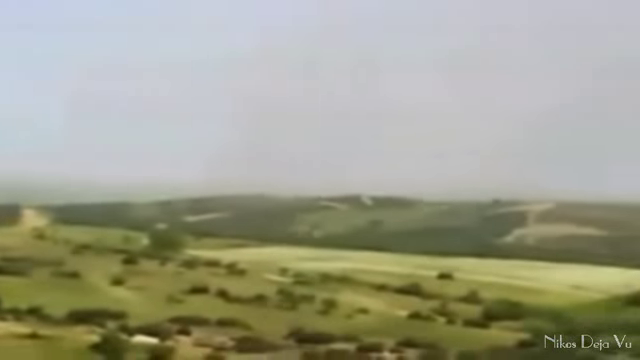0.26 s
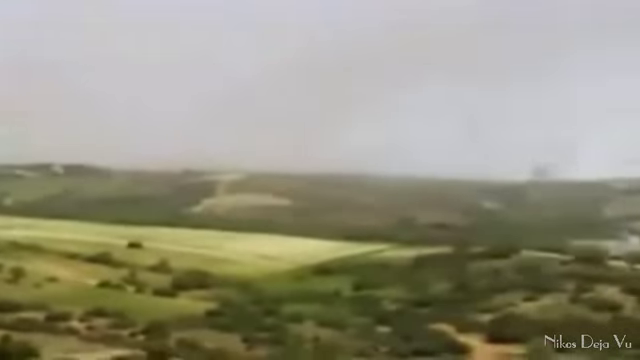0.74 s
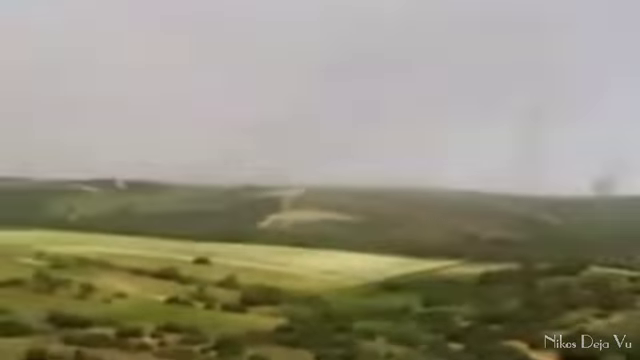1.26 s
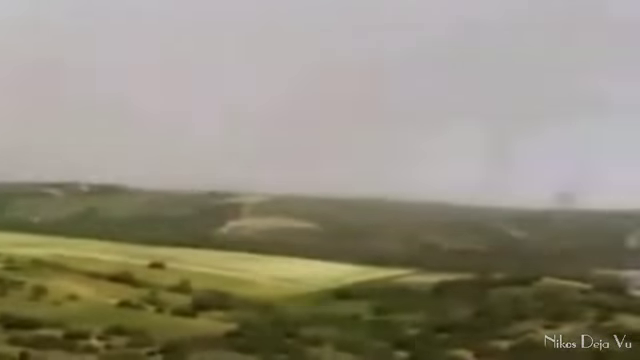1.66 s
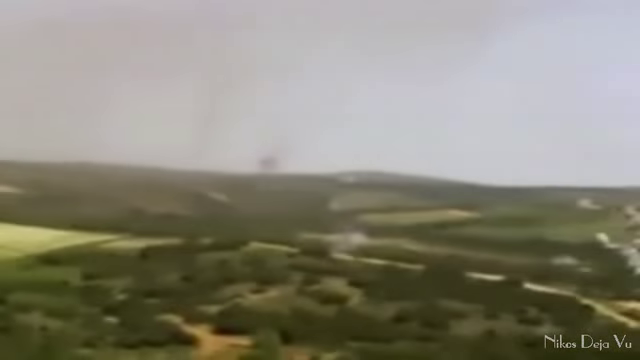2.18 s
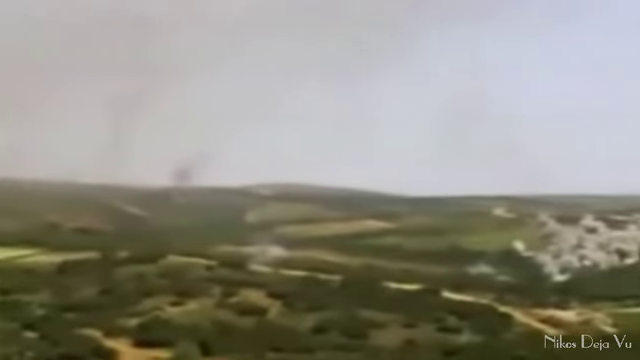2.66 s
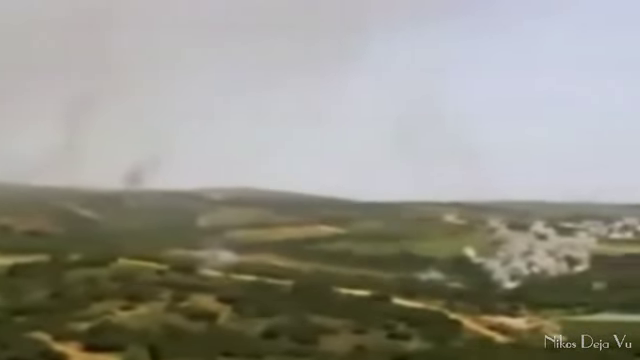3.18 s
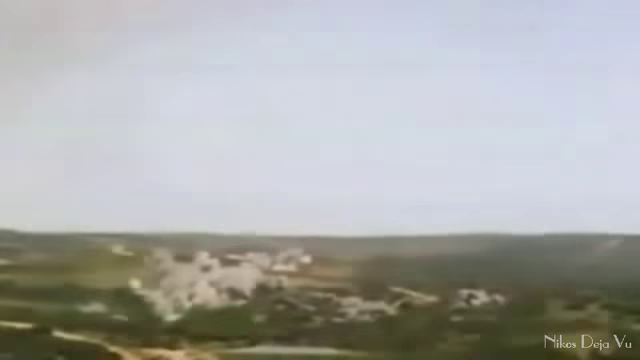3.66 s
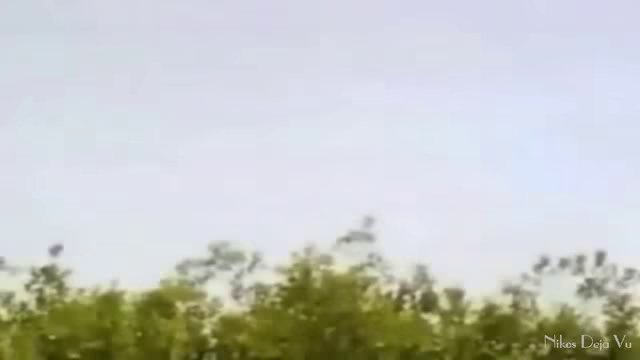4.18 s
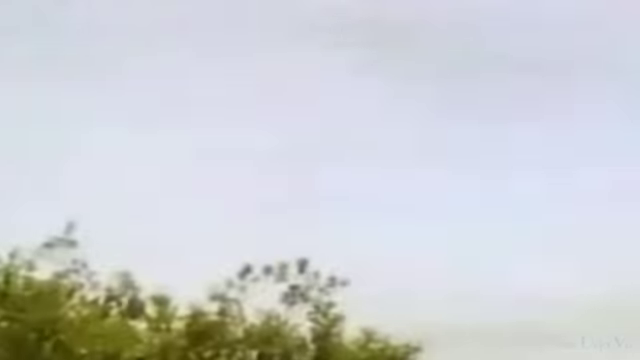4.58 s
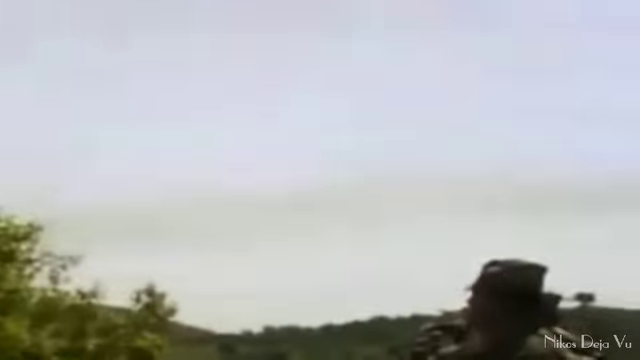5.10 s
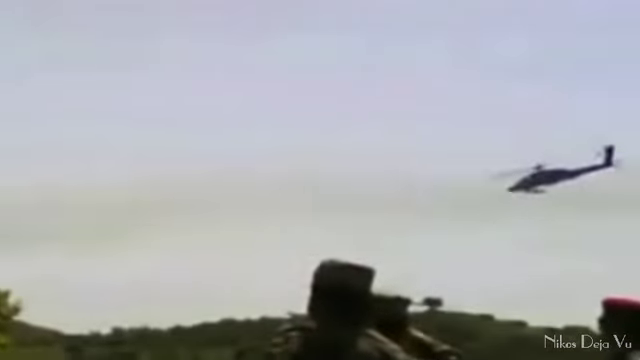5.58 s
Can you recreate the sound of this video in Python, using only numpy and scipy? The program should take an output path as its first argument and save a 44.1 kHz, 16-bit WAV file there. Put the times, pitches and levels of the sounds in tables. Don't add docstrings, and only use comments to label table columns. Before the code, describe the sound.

A hovering helicopter fires two roaring rocket salvos with dull gun thuds, then far impacts crack and boom in a string over chopping rotor noise.

```python
import sys
import numpy as np
from scipy import signal
from scipy.fft import rfft, irfft
from scipy.io import wavfile
from scipy.ndimage import uniform_filter1d

SR = 44100
rng = np.random.default_rng(int(sys.argv[2]) if len(sys.argv) > 2 else 0)


def transcribe(signal):
    frames = np.atleast_2d(signal).T
    limited = np.clip(frames, -1, 1)
    pcm = np.round(limited * 32767).astype(np.int16)
    wavfile.write(sys.argv[1], SR, pcm)


def ratio_of_db(decibels):
    return 10 ** (np.asarray(decibels, float) / 20)


N = 257544
T = np.arange(N) / SR
F = np.fft.rfftfreq(N, 1 / SR) + 1e-3

# low edge [f/Hz], high edge [f/Hz]
ROAR_BANDS_HZ = [(450, 1200), (40, 350), (1300, 3000), (3300, 7500)]
# [f/Hz], density [level/dB per Hz]
ROAR_COLOUR = [(15, -44), (25, -31.5), (49, -0.5), (98, -2), (134, 1.5), (202, 1), (416, -2), (504, 4.5),
               (656, 8), (963, 2), (1600, -3), (2180, -6), (3050, -8), (5700, -16.5), (7790, -31),
               (10100, -80.5), (17100, -120)]
# [t/s], [level/dB]
ROTOR_LEVEL = [
    (3.9, -27),
    (4.287, -29),
    (4.564, -33.5),
    (4.898, -31),
    (5.332, -29.5),
    (5.552, -29),
    (5.84, -31.5),
]
# [f/Hz], density [level/dB per Hz]
ROTOR_COLOUR = [(15, -22.5), (25, 1), (152, 0.5), (480, -3.5), (672, 0), (1040, -6), (2400, -9.5),
                (3280, -19.5), (3610, -20.5), (3880, -22), (7790, -39.5), (10100, -58.5), (17100, -120)]
# [t/s], strength [level/dB], brightness [f/Hz], ground echo delay [t/ms], echo [level/dB]
BLASTS = [(4.2194, 5, 2700, 14, 0.5), (4.449, 4, 2500, 13, 2), (4.549, 3, 4970, 13, -6),
          (4.742, 3, 513, 18, 1), (4.895, 4.5, 2190, 14, 0.5), (5.068, 2.5, 392, 17, -5.5),
          (5.3665, 5, 2180, 16, -1), (5.4838, 6.5, 2290, 13, 5), (5.5735, -4.5, 350, 19, -20),
          (5.5836, 3, 2360, 15, 4), (5.745, 6.5, 1820, 11, -8), (5.773, 3, 1900, 15, 1.5)]
# [t/s], strength [level/dB], brightness [f/Hz], ground echo delay [t/ms], echo [level/dB]
IGNITIONS = [
    (1.634, 4.9, 1700, 14, -6.5),
    (1.7005, 1.9, 2120, 16, -17.5),
]
# [t/s], peak [level/dB], pitch [f/Hz]
THUDS = [(0.453, -14.5, 212), (.490, -10, 199), (0.7955, -7, 179), (0.898, -5.5, 168), (1.012, -16, 171),
         (1.146, -16.5, 167), (3.246, -13, 115.4), (3.35, -6, 118), (3.549, -2, 149), (3.608, -9.5, 63),
         (3.703, -10.5, 131), (3.84, -18, 151)]
# [t/s], [level/dB], distance [0-1]
SALVOS = [
    [(0, -14.5, 0.22), (.27, -13, 0.02), (.56, -16, 0.6), (.75, -17.5, 0.75), (.9, -22, 1),
     (1.02, -21, 0.88), (1.31, -30, .6), (1.55, -27.5, 1), (1.631, -28, 1)],
    [(1.636, -18, 0.63), (1.85, -16, .5), (1.97, -12.5, 0.64), (2.42, -11.5, 0.5), (2.75, -11.5, 0.47),
     (3.39, -14, 0.66), (3.72, -19.5, 0.89), (3.9, -26.5, 0.74), (4.17, -35, 0.7)],
]
# first [f/Hz], last [f/Hz], then first, midway and last [level/dB]
FRINGES = [
    [(843, 820, -8, -8.5, -9.5), (590, 560, -2.5, -3.5, 9.5), (300, 160, 6.5, 0, -4.5),
     (3280, 3250, -2.5, 2, 10), (4640, 5300, 2.5, -8, -6.5), (1390, 1350, 5.5, 4, 1.5),
     (2550, 2700, 0.5, 1.5, 7)],
    [(2505, 4400, -10.5, -0.5, 2.5), (2126, 2600, 3.5, 4, 6), (798, 800, -5, -2, -14),
     (957, 810, 4, 0.5, -1.5), (1546, 1850, 0.5, -6.5, 0.5), (4230, 6300, 3.5, 6, -7),
     (603, 580, -2, -2, 5.5), (2380, 3100, -0.5, 2.5, 5), (1320, 1500, 5, -3, 6)],
]

# close by, and their change at full distance (dB)
NEAR_DB, FAR_DB = [-13, 0, -5], [16.5, 1.44, -8.5]
FRINGE_WIDTH_HZ, FRINGE_WIDTH_SHARE = 48, .05
BLADE_HZ = 19
CRACK_DB, CRACK_DB_PER_OCTAVE = -6.5, 6.5
HILLS_T60_S, HILLS_DB = 0.36, -21
OVERLOAD = 0.65
TICK_S, TICK_DB = 2.4618, -25
TOP_HZ = 7990


def level(x, db):
    return x * ratio_of_db(db) / np.sqrt(np.mean(x ** 2))


def walk(rate):
    k = int(SR / rate)
    held = np.repeat(rng.standard_normal(N // k + 1), k)
    return 1.3 * uniform_filter1d(uniform_filter1d(held, k), k)[:N]


def low(x, hz):
    return signal.lfilter(*signal.butter(2, min(hz, .4 * SR), fs=SR), x)


def band(x, hz, spread):
    edges = [hz / spread, min(hz * spread, .4 * SR)]
    return signal.lfilter(*signal.butter(2, edges, "band", fs=SR), x)


def noise_bands(colour):
    hz, db = np.transpose(colour)
    spectrum = rfft(rng.standard_normal(N)) * ratio_of_db(np.interp(np.log(F), np.log(hz), db))
    centres = 22 * 2 ** np.arange(0, 9, .5)
    shapes = (np.clip(1 - 2 * np.abs(np.log2(F / c)), 0, 1) for c in centres)
    return spectrum, centres, [irfft(spectrum * s, N) for s in shapes]


def rotor():
    s, db = np.transpose(ROTOR_LEVEL)
    phase = 2 * np.pi * BLADE_HZ * T + 0.5 * walk(9.2)
    chop_db = 1.6 * np.cos(phase) + .6 * walk(25)
    wash = 0
    for noise in noise_bands(ROTOR_COLOUR)[2]:
        wash = wash + noise * ratio_of_db(chop_db + 1.6 * walk(9.1))
    return level(wash, 0) * ratio_of_db(np.interp(T, s, db))


def hills(x):
    t = T[:SR]
    scatter = rng.standard_normal(len(t)) * (rng.random(len(t)) < .05) * (t > .022)
    tail = band(scatter, 500, 4.2) * np.exp(-np.log(1000) * t / HILLS_T60_S)
    return ratio_of_db(HILLS_DB) * signal.fftconvolve(x, tail / np.sqrt(np.sum(tail ** 2)))[:N]


def thuds():
    out, t = np.zeros(N + SR), T[:SR // 10]
    for s, db, hz in THUDS:
        cycle = np.sin(2 * np.pi * hz * t) * np.exp(-(t * hz) ** 2)
        start = int(s * SR)
        out[start:start + len(t)] += ratio_of_db(db) * cycle
    return out[:N]


def blasts(table, push_share):
    out, t = np.zeros(N + SR), T[:SR // 4]
    for s, db, bright_hz, echo_ms, echo_db in table:
        crack_db = CRACK_DB + CRACK_DB_PER_OCTAVE * np.log2(bright_hz / 2000)
        push_s = push_share * echo_ms / 1000
        push = -2.1 * (t < push_s)
        rebound = np.exp(-(np.abs(t - 3.2 * push_s) / (2.1 * push_s)) ** 2)
        suction = 0.81 * (t >= push_s) * rebound
        hiss = rng.standard_normal((4, len(t)))
        roll = 3.2 * band(hiss[3], 75, 2.6) * np.exp(-t / .04) * (t > echo_ms / 1000)
        spray = band(hiss[0], bright_hz, 1.9) + 2.0 * band(hiss[0], 1900, 1.4)
        crack = spray * np.exp(-((t - .8 * push_s) / .0014) ** 2)
        crack = 3.27 * ratio_of_db(crack_db) * crack / np.max(np.abs(crack))
        debris = band(hiss[1:], 500 + 0.1 * bright_hz, 2.62) * np.exp(-t / 0.01) * (t > push_s)
        debris = 1.16 * ratio_of_db(0.14 * crack_db) * debris
        wave = low(push + suction, bright_hz) + crack + debris[0] + roll
        smear = 0.21 * push - np.exp(-t / 0.011)
        echo = low(smear, 150 + 0.27 * bright_hz) + 0.79 * debris[1]
        lag = int(echo_ms * SR / 1000)
        wave[lag:] += ratio_of_db(echo_db) * echo[:-lag]
        start = int(s * SR)
        out[start:start + len(t)] += ratio_of_db(db - 12.5) * wave
    return out[:N]


def fringes(x):
    f, t, z = signal.stft(x, SR, nperseg=1024)
    second = t > SALVOS[1][0][0]
    for salvo, rows, on in zip(SALVOS, FRINGES, (~second, second)):
        done = (t - salvo[0][0]) / (salvo[-1][0] - salvo[0][0])
        for first_hz, last_hz, *db in rows:
            hz = np.interp(done, [0, 1], [first_hz, last_hz])
            width_hz = FRINGE_WIDTH_HZ + FRINGE_WIDTH_SHARE * hz
            shape = np.exp(-((f[:, None] - hz) / width_hz) ** 2)
            z = z * ratio_of_db(on * np.interp(done, [0, .5, 1], db) * shape)
    return signal.istft(z, SR, nperseg=1024)[1][:N]


def roar():
    s, mid_db, distance = np.vstack(SALVOS).T
    relative_db = np.array(NEAR_DB)[:, None] + np.outer(FAR_DB, distance)
    spectrum, centres, bands = noise_bands(ROAR_COLOUR)
    power = [np.sum(np.abs(spectrum[(F > a) & (F < b)]) ** 2) * 2 / N ** 2 for a, b in ROAR_BANDS_HZ]
    target_db = np.array([mid_db, *(mid_db + r for r in relative_db)])
    gains_db = target_db - 10 * np.log10(power)[:, None]
    order = np.argsort(ROAR_BANDS_HZ, axis=0)[:, 0]
    anchors = np.log(np.prod(ROAR_BANDS_HZ, axis=1)[order]) / 2
    surge_db = .4 * walk(16) + .8 * walk(40)
    out = 0
    for hz, noise in zip(centres, bands):
        db = [np.interp(np.log(hz), anchors, g) for g in gains_db[order].T]
        flicker_db = .6 * walk(22)
        out = out + noise * ratio_of_db(np.interp(T, s, db) + surge_db + flicker_db)
    past_db = 0.74 * np.clip(np.interp(T, s, mid_db) + 17.0, 0, None)
    fade_db = 60 * np.clip(T - s[-1], 0, None)
    return out * ratio_of_db(past_db - fade_db)


def scene():
    bangs = blasts(BLASTS, push_share=.16) + blasts(IGNITIONS, push_share=0.051) + thuds()
    return (fringes(roar()) + rotor() + bangs + hills(bangs))[None]


def input_stage(x):
    load = signal.lfilter([1 / 1300], [1, 1 / 1300 - 1], np.clip(x, -1, 1) ** 2)
    ceiling = OVERLOAD * (1 + .6 * np.exp(-load / .05))
    over = x / ceiling
    x = ceiling * over / (1 + np.abs(over) ** 4.3) ** (1 / 3.65)
    x = x + 0.18 * band(x, 1870, 1.23)
    return low(signal.lfilter(*signal.butter(1, 16, "high", fs=SR), x), 5340)


def coarse(x, size):
    f, t, z = signal.stft(x, SR, "cosine", nperseg=size)
    near = np.abs(uniform_filter1d(np.abs(z), size // 128, axis=0))
    loud_db = 10 * np.log10(np.sum(np.abs(z) ** 2, axis=0) + 1e-12)
    luck = uniform_filter1d(rng.standard_normal((size // 16 + 1, len(t))), 4)
    floor_db = .85 * loud_db - 55 + 11 * luck
    floor = ratio_of_db(np.repeat(floor_db, 8, axis=0)[:len(f)])
    step = np.maximum(ratio_of_db(-8) * near, floor)
    return signal.istft(np.round(z / step) * step, SR, "cosine", nperseg=size)[1][:N]


def grain(x):
    sudden = uniform_filter1d(x ** 2, 256) > 8 * uniform_filter1d(x ** 2, 8192)
    held = np.clip(uniform_filter1d(1. * sudden, 1024) * 100, 0, 1)
    gate = uniform_filter1d(held, 512)
    bang = signal.sosfiltfilt(signal.butter(10, 6900, fs=SR, output="sos"), gate * x)
    return gate * bang + (1 + gate) * coarse((1 - gate) * x, size=4096)


def band_limit(x):
    return signal.sosfilt(signal.butter(12, 15400, fs=SR, output="sos"), x)


def record(dry):
    x = grain(input_stage(dry[0]))
    x = signal.sosfiltfilt(signal.ellip(8, .2, 45, TOP_HZ, fs=SR, output="sos"), x)
    x = x - ratio_of_db(TICK_DB) * (np.arange(N) == int(TICK_S * SR))
    return band_limit(np.clip(x, -1, 1)[None])


dry = scene()
out = record(dry)
transcribe(out)
```